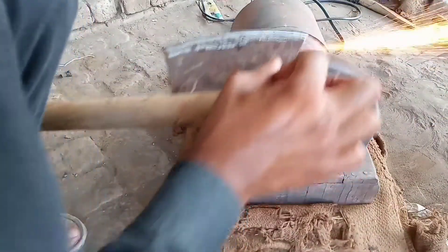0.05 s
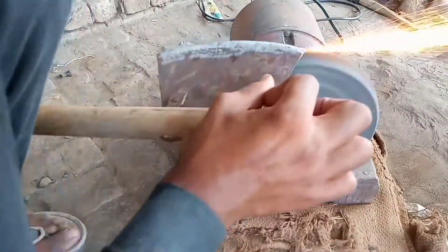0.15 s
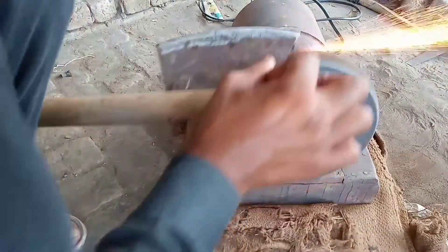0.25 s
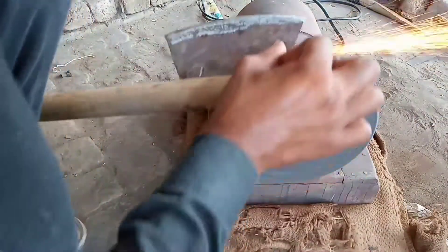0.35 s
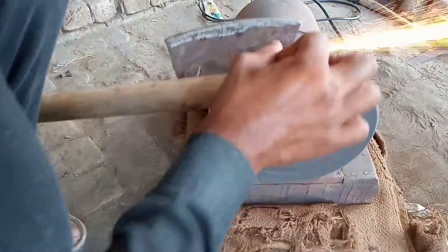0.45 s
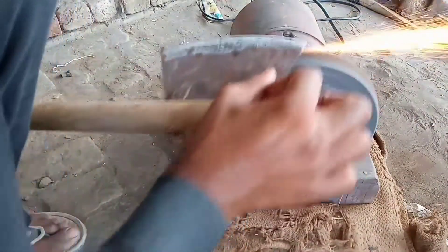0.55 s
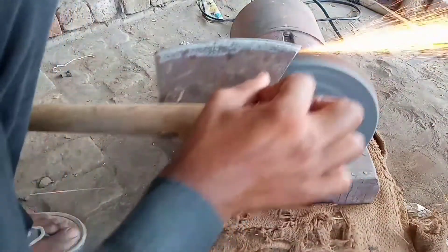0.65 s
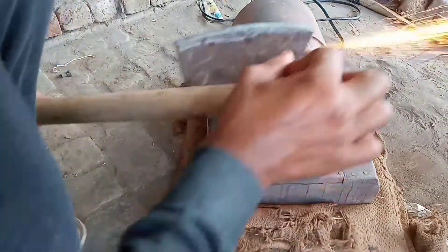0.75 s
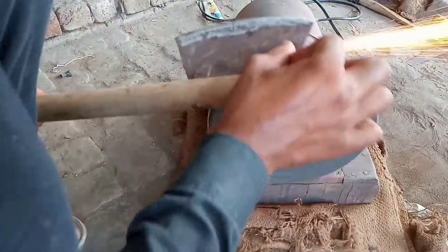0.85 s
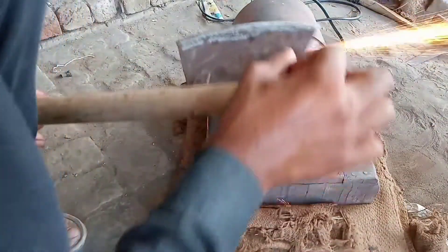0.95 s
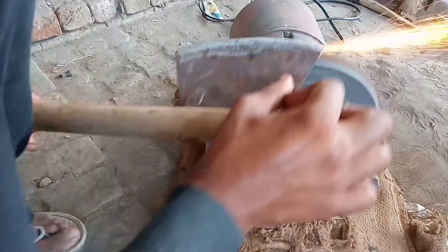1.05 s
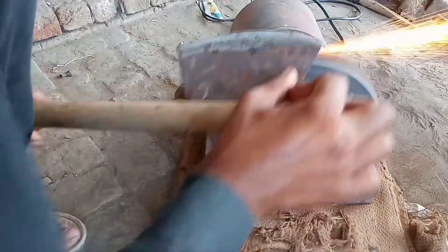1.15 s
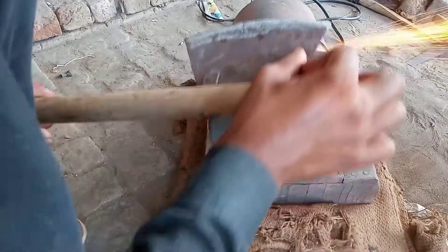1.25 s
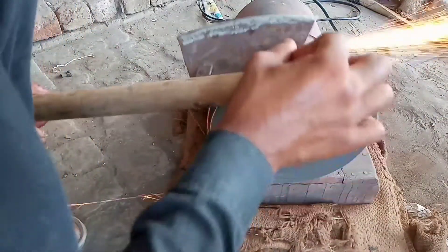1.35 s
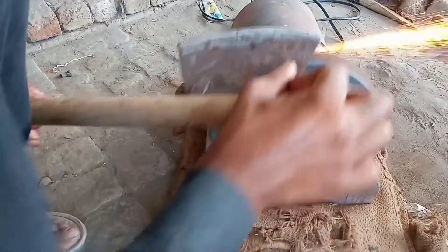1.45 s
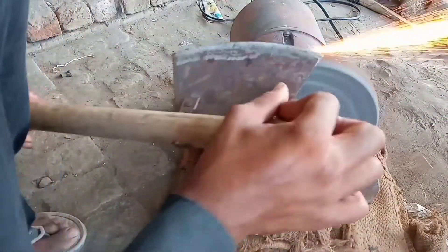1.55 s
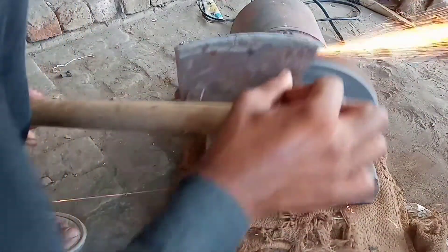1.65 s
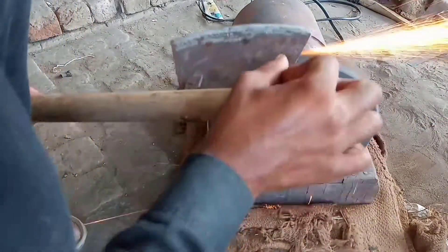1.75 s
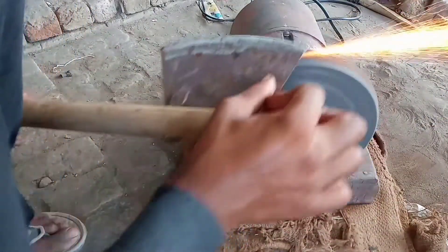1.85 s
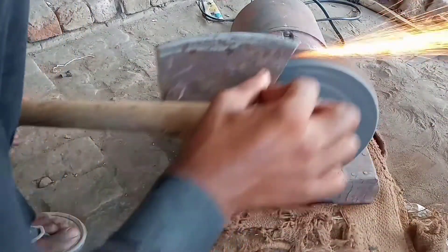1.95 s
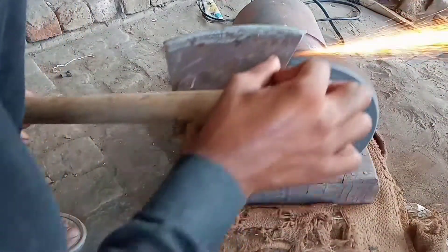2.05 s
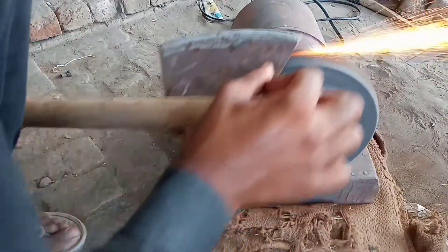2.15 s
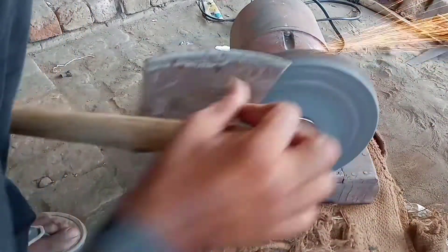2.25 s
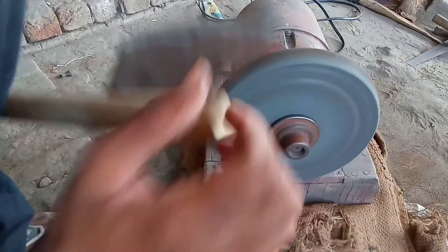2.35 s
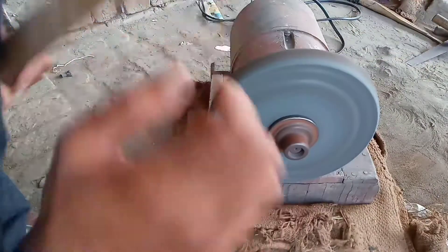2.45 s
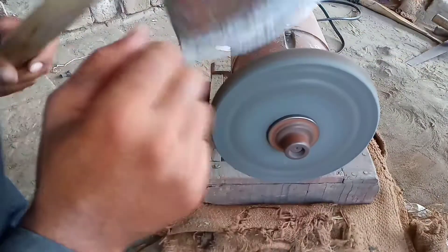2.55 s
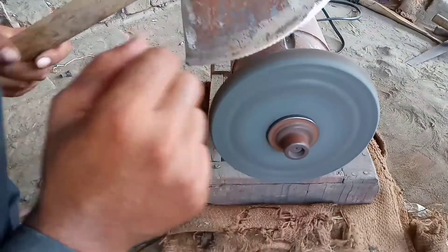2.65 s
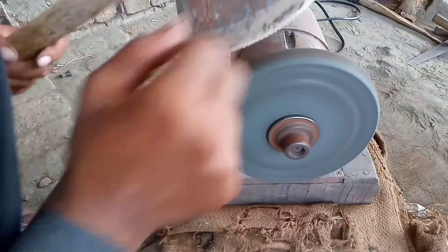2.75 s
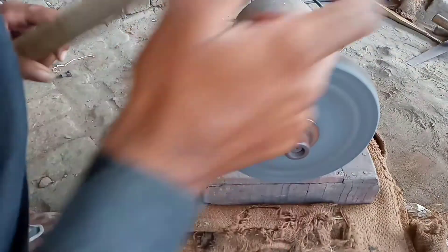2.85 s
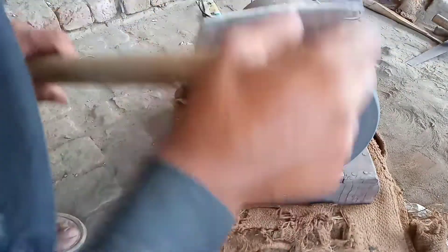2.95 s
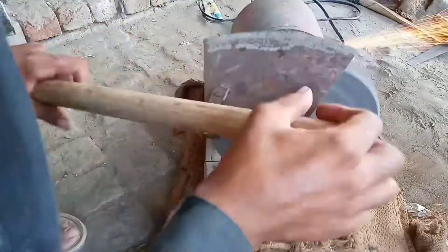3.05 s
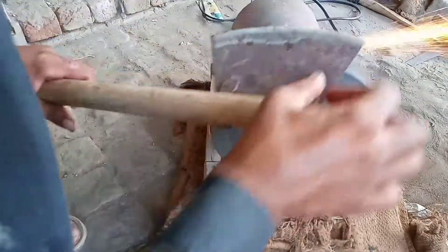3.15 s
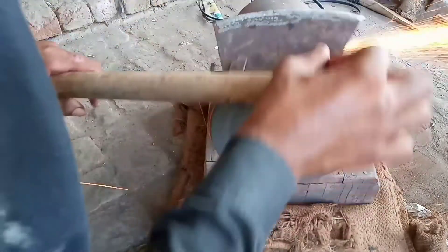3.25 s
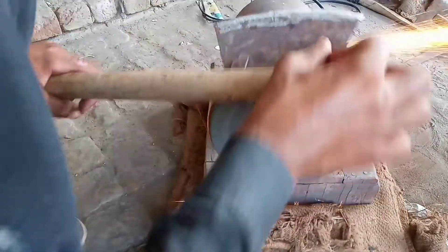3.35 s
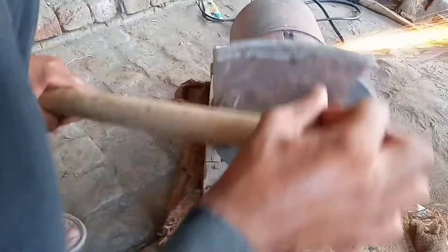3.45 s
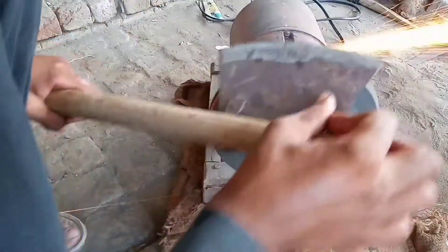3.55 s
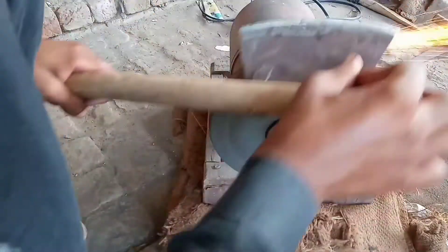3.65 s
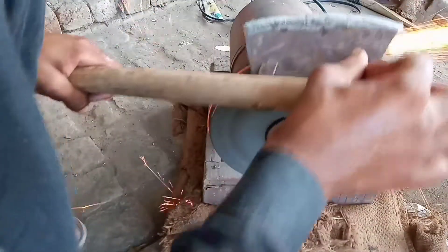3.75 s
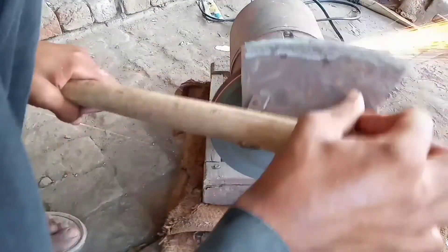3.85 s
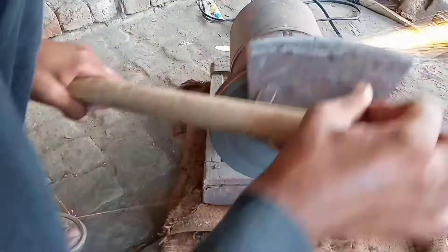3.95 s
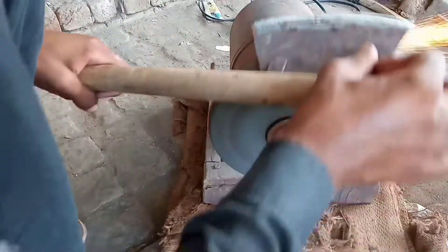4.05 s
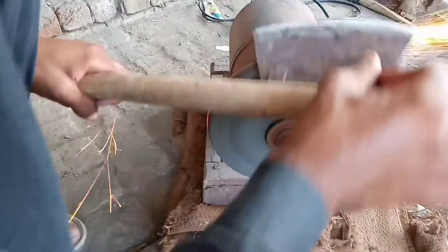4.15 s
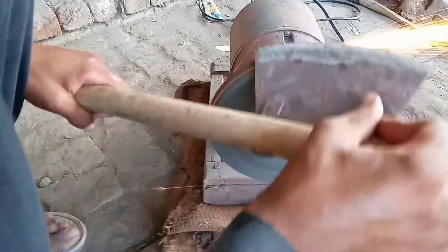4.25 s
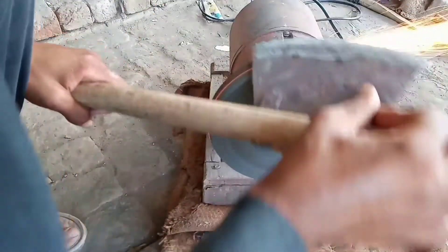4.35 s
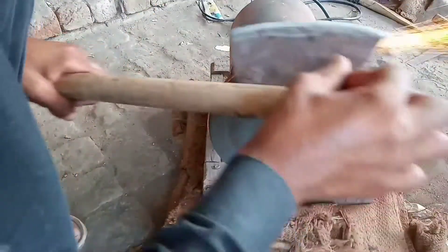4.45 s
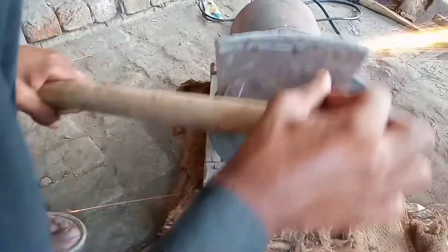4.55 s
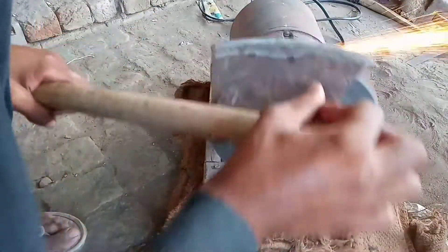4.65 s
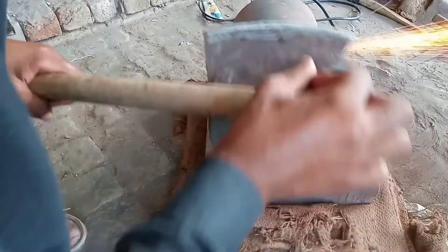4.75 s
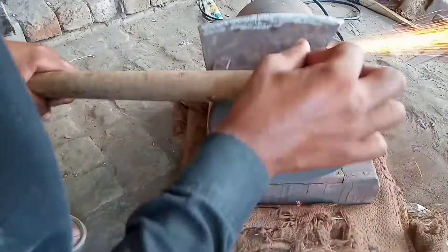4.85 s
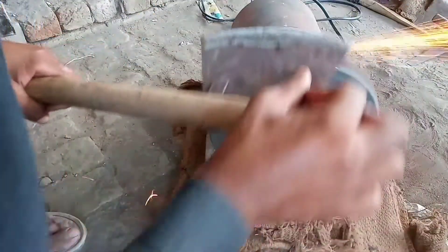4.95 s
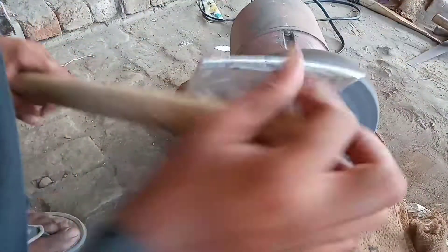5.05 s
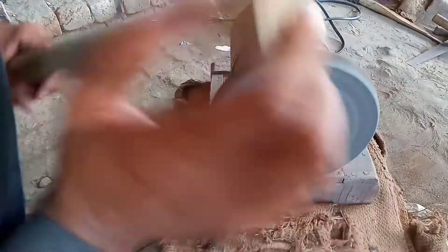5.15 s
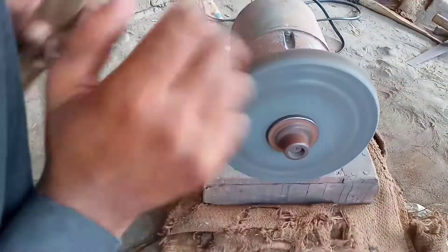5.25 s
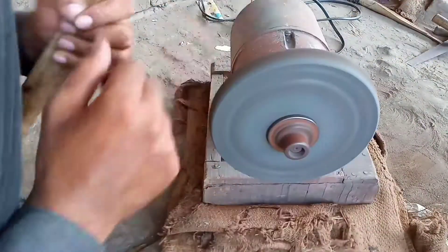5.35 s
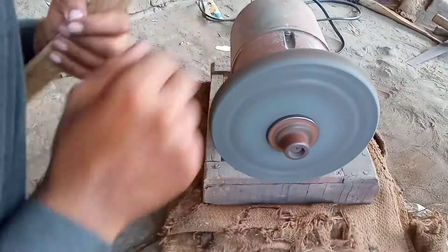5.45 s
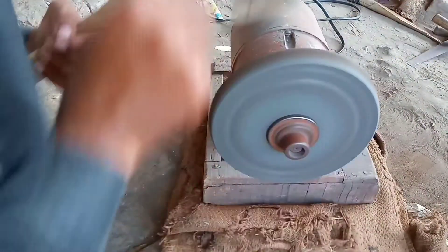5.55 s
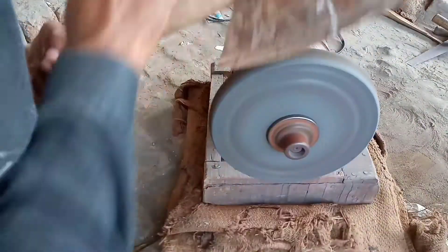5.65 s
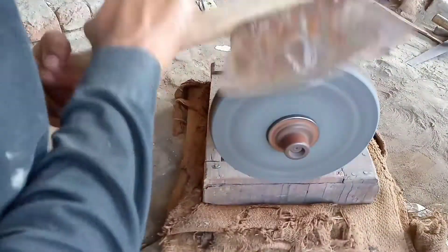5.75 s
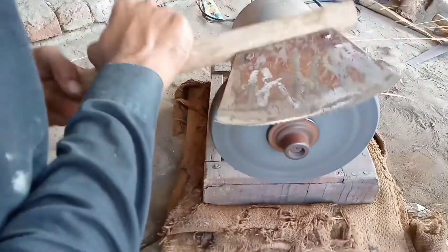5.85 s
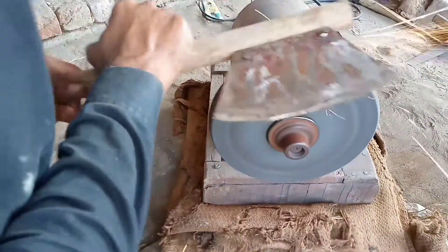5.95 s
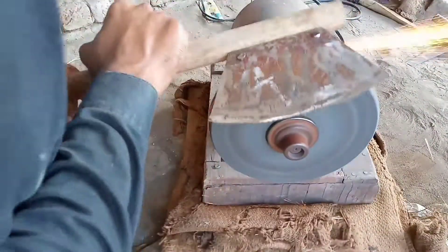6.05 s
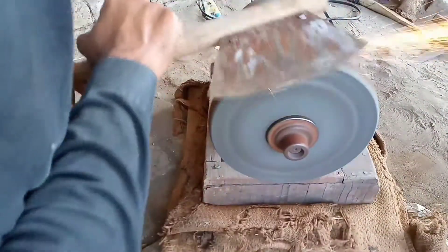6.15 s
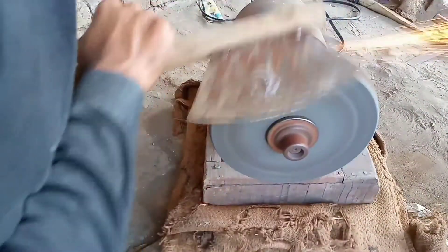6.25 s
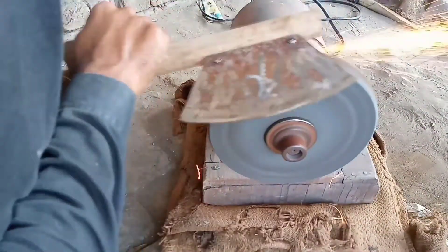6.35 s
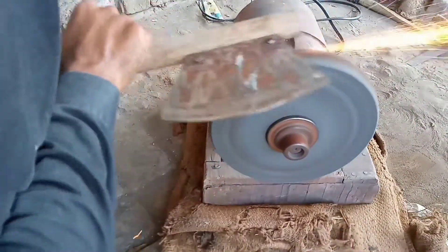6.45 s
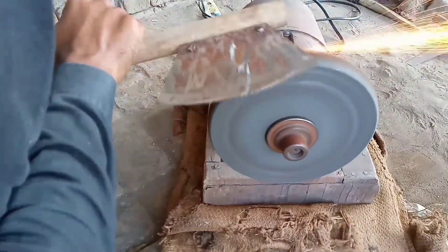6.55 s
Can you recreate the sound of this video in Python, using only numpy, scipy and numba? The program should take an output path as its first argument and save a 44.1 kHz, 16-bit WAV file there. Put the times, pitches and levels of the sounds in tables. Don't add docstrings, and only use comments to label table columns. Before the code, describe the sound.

Three strokes of steel on a grinding wheel, heard dry and near through a phone. The first is already under way, harsh and gritty with shifting high ringing; the second lands with a knock and sounds fuller; the last starts with clattering bounces and is shorter and softer. Between them the machine idles with a low hum, loose bearing ticks and housing rattle.

```python
import sys
import numpy as np
from scipy import signal
from scipy.fft import rfft, irfft, next_fast_len
from scipy.io import wavfile
from scipy.ndimage import uniform_filter1d
from numba import njit

SR = 44100
rng = np.random.default_rng(int(sys.argv[2]) if len(sys.argv) > 2 else 0)


def transcribe(u):
    v = np.clip(np.atleast_2d(u).T, -1, 1)
    q = np.round(v * 32767).astype(np.int16)
    wavfile.write(sys.argv[1], SR, q)


def field_ratio(decibels):
    return 10 ** (np.asarray(decibels, dtype=float) / 20)


N = 290619
STEP = 64
WHEEL_HZ = 35.82

# (touch [s], lift [s], bite [dB])
STROKES = [
    (0, 2.292, -26),
    (3.096, 5.072, -27),
    (5.988, 6.7, -32),
]
# (body [dB], rumble [dB], sizzle [dB])
STROKE_SHARES = [
    (-7, -18, -30),
    (-2, -25.5, -29),
    (-3, -24, -32.5),
]
# (time [s], length [s], extra bite [dB])
PUSHES = [(.09, 0.26, 4.5), (.6, 0.22, 5), (.78, 0.28, 5), (1.05, .15, 4.5), (1.24, .18, 5),
          (1.55, 0.23, 2), (1.82, .2, 1.5), (2.12, .12, 2), (2.26, .15, 3), (3.13, .12, 4), (3.55, 0.46, 7),
          (3.85, 0.24, 6), (4.05, .25, 4), (4.33, 0.44, 2.5), (4.52, .2, 3.5), (4.72, .25, 2.5),
          (5.05, 0.16, 4), (6.17, .12, 4), (6.27, .25, 4), (6.42, .25, 3.5), (6.62, 0.87, 9)]
# (time [s], length [s], weight [dB], sparks [dB])
LEANS = [(.2, 0.36, 4.5, 5), (.45, .2, 3, 3), (.68, 0.29, 8, 8), (.9, .2, 4, 0.1), (1.12, .4, 7, 5),
         (1.55, .3, 5, 2), (1.75, .3, 1, 3.5), (2.0, .25, 5, 2), (2.27, .3, 11, 8), (3.12, .2, 7, 7),
         (3.37, .2, -6, 1.5), (3.57, .3, 15, 6), (3.95, .35, 16, 4), (4.35, .35, 17, 4), (4.72, .35, 15, 3),
         (5.03, 0.17, 10, 5), (6.07, 0.18, 9, 3), (6.43, 0.22, 14, 4), (6.58, .2, 5, 5)]
# (time [s], length [s], drop [dB])
SKIPS = [(3.09, .012, -5), (3.335, .015, -3), (4.155, .02, -7), (4.183, .015, -4), (4.575, .015, -3),
         (6.028, .022, -12), (6.067, .026, -12), (6.098, .022, -10), (6.128, .01, -5), (6.143, .014, -6),
         (6.166, .016, -3), (6.193, .016, -3)]
# (time [s], peak [dB], body share [dB])
SNAGS = [(0.0194, -10, -1.5), (0.0453, -12, -1.5), (0.0643, -8, -1.5), (0.1206, -12, -1.5),
         (0.2224, -14, -1.5), (0.3257, -13, -1.5), (0.3815, -14, -1.5), (0.416, -16, -1.5),
         (0.4354, -16, -1.5), (0.4853, -17, -1.5), (0.5237, -15, -1.5), (0.5407, -13, -1.5),
         (0.5676, -11, -1.5), (0.6958, -11, -1.5), (0.7272, -12, -1.5), (0.7726, -10, -1.5),
         (0.8155, -12, -1.5), (0.8849, -17, -1.5), (0.9068, -17, -1.5), (0.9178, -13, -1.5),
         (0.9472, -15, -1.5), (0.9807, -14, -1.5), (1.0395, -10, -1.5), (1.1618, -13, -1.5),
         (1.2002, -13, -1.5), (1.2431, -9, -1.5), (1.2835, -11, -1.5), (1.3404, -14, -1.5),
         (1.3528, -16, -1.5), (1.3862, -14, -1.5), (1.4292, -15, -1.5), (1.4521, -17, -1.5),
         (1.4755, -14, -1.5), (1.4925, -10, -1.5), (1.5419, -13, -1.5), (1.6137, -16, -1.5),
         (1.6676, -13, -1.5), (1.6876, -13, -1.5), (1.712, -13, -1.5), (1.7699, -11, -1.5),
         (1.9405, -16, -1.5), (1.9634, -16, -1.5), (2.0502, -13, -1.5), (2.0892, -13, -1.5),
         (2.156, -12, -1.5), (2.2373, -12, -1.5), (2.2777, -14, -1.5),
         (3.1244, -10, -1.5), (3.1827, -15, -1.5), (3.1957, -14, -1.5), (3.2665, -12, -1.5),
                (3.3214, -13, -1.5), (3.3444, -15, -1.5), (3.3673, -13, -1.5), (3.3953, -13, -1.5),
                (3.4222, -9, -1.5), (3.4506, -10, -1.5), (3.4701, -9, -1.5), (3.5309, -11, -1.5),
                (3.6696, -10, -1.5), (3.7145, -12, -1.5), (3.7315, -12, -1.5), (3.7569, -16, -1.5),
                (3.7729, -16, -1.5), (3.7899, -14, -1.5), (3.8083, -11, -1.5), (3.8218, -12, -1.5),
                (3.8343, -12, -1.5), (3.8667, -10, -1.5), (3.9056, -11, -1.5), (3.9759, -13, -1.5),
                (4.0268, -14, -1.5), (4.0942, -13, -1.5), (4.1685, -16, -1.5), (4.1904, -12, -1.5),
                (4.2079, -12, -1.5), (4.4603, -11, -1.5), (4.4778, -11, -1.5), (4.4938, -9, -1.5),
                (4.5127, -12, -1.5), (4.5491, -14, -1.5), (4.5821, -13, -1.5), (4.6674, -14, -1.5),
                (4.7287, -15, -1.5), (4.7756, -15, -1.5), (4.7901, -13, -1.5), (4.818, -14, -1.5),
                (4.8355, -13, -1.5), (4.8829, -14, -1.5), (4.9108, -12, -1.5), (4.9457, -15, -1.5),
                (4.9692, -13, -1.5), (4.9866, -11, -1.5), (5.0465, -13, -1.5),
         (6.1553, -17, -1.5), (6.1742, -16, -1.5), (6.1997, -17, -1.5), (6.2346, -16, -1.5),
               (6.284, -12, -1.5), (6.3249, -17, -1.5), (6.3344, -15, -1.5), (6.3648, -11, -1.5),
               (6.4017, -14, -1.5), (6.4262, -13, -1.5), (6.4616, -14, -1.5), (6.4726, -11, -1.5),
               (6.515, -13, -1.5), (6.5708, -12, -1.5)]
# (time [s], peak [dB], ring [dB], body [dB])
CATCHES = [(.0185, -14, -33, -28), (.09, -25, -8, -29), (.54, -23.5, -3, -12), (1.4917, -14.5, -3, -6),
           (1.712, -20, -8, -13), (1.775, -23, -23, -12), (2.2387, -27, -23, 5), (2.2784, -22, -23, 2),
           (3.4496, -30, -19, 7), (3.47, -18, -29, -8), (5.0724, -25, -26, -19)]
# (time [s], peak [dB], ring [dB], body [dB])
BOUNCES = [(3.0761, -5, -40, -21.5), (3.0973, -16.5, -19, 1.5), (3.1224, -13.5, -31, -7),
           (5.8839, -14, -3, -1), (5.8924, -14.5, -9, -1), (5.944, -6.5, -13, -2), (5.9895, -20, -26, -16),
           (6.0016, -13, -25, -19), (6.015, -14, -20, -11), (6.0367, -7, -21, -16), (6.0778, -16.5, -17, 0),
           (6.1065, -11, -27, -9), (6.1194, -11.5, -31, -18), (6.149, -26, -19, -26),
           (6.1736, -25, -15, -11), (6.1998, -23, -17, -16), (6.234, -24.5, -6, 1), (6.2834, -18, -31, -14),
           (6.3153, -23, -6.5, -3), (6.3642, -14, -16, -19), (6.4033, -24, -15, -9)]
# (frequency [Hz], level [dB])
EDGE_TONE = [(25, -22), (80, -6), (450, -5), (1000, -13), (1500, -4), (2300, -2), (3300, -3), (4000, -6),
             (4800, -35.5), (5700, -27.5), (7200, -17), (7700, -35), (10300, -43), (15600, -51.5)]
PATCH_EDGES_HZ = [20, 700, 1150, 1750, 2300, 3000, 3550, 4700, 6000, 9000, 12000, 18000]
# (frequency [Hz], width [Hz], level [dB])
CHEEK_MODES = [(1266, 142, -10), (1588, 250, -9.5), (1875, 134, -12.5), (2088, 173, -14.5), (2577, 55, -15),
               (2948, 250, -13.5), (4135, 61, -21.5), (4470, 98, -24)]
# (time [s], length [s], swell [dB])
BOOMS = [(.1, .3, -4), (.47, .1, 3), (.75, .2, 3), (1.07, .2, 4), (1.5, .2, 2), (2.25, .15, 3),
         (3.15, .15, 4), (3.25, .2, 4), (3.45, .25, 5), (3.66, .15, 5), (4.0, .3, -5), (4.26, .1, 3),
         (4.35, .1, -3), (4.55, .2, 2), (4.72, .15, 1.5), (4.87, .15, 3), (5.0, .15, 3), (6.25, .15, 5)]
# (frequency [Hz], width [Hz], level [dB])
BLADE_MODES = [(4980, 150, -5), (5350, 100, -6), (6030, 50, 0), (6630, 60, -4), (7120, 70, -3),
               (7800, 55, -12), (8010, 45, -14), (8530, 60, -17), (9000, 60, -18), (9600, 130, -20),
               (10900, 100, -20), (11500, 100, -20), (12480, 100, -19), (12900, 110, -19),
               (13400, 140, -19), (14600, 75, -14), (15000, 90, -19), (15380, 70, -17)]
# (frequency [Hz], width [Hz])
SINGERS = [
    (2435, 35),
    (2718, 45),
    (3710, 22),
    (7270, 84),
]
SING_REST_DB = (-11, -9, -13, -25)
# (time [s], length [s], swell [dB])
SONGS_LOW = [(0.697, 0.27, 12), (1.075, 0.2, 11), (1.23, .16, 10), (1.622, .3, 7), (1.97, 0.23, 8),
             (2.23, .15, 10), (3.13, .13, 15), (3.21, .1, 8), (3.57, .25, 14.5), (4.05, .3, 14),
             (3.87, .2, 8), (4.3, 0.23, 8), (4.5, .3, 12), (4.69, .15, 15), (4.82, .1, 8),
             (5.035, 0.24, 14), (6.0, .1, 8), (6.58, .3, 6)]
SONGS_MID = [(.11, 0.27, 14), (.32, .2, 10), (.56, 0.13, 11), (.79, .2, 11.5), (1.3, 0.18, 4.4),
             (1.78, 0.27, 11.4), (2.2, .3, 5.4), (3.1, .1, 6), (3.7, .2, 12), (4.05, .25, 7.7),
             (4.84, 0.18, 5), (5.03, .15, 8.7), (4.5, .15, 7), (6.0, .05, 8), (6.22, .1, 8),
             (6.36, .35, 12), (6.55, .15, 6)]
SONGS_HIGH = [(.2, 0.43, 6.9), (.62, .3, 5.4), (1.065, .22, 14), (1.21, 0.22, 14), (1.54, .2, 12.4),
              (1.72, 0.16, 9), (1.88, .25, 10), (2.15, .2, 7.4), (3.15, .15, 8), (3.25, .24, 13),
              (3.42, .2, 11), (3.55, .15, 7), (3.7, .15, 11), (3.95, .3, 11), (4.25, .3, 9), (4.39, .15, 8),
              (4.59, .2, 11), (4.77, .14, 9), (5.04, .12, 13), (6.24, .2, 13), (6.42, .2, 11),
              (6.59, 0.35, 15)]
SONGS_TOP = [(.7, 0.23, 13), (2.22, .25, 10), (3.5, 0.39, 10), (4.3, .4, 9), (5.05, .15, 8), (6.09, .2, 17),
             (6.42, 0.28, 16), (6.57, 0.17, 12)]
# (frequency [Hz], width [Hz], level [dB])
HALO = (3790, 140, -12)
# (frequency [Hz], width [Hz], rest level [dB])
WHISTLE = (4520, 40, -30)
# (time [s], length [s], swell [dB])
WHISTLES = [(.96, .06, 10), (1.045, .09, 14), (1.27, .12, 12), (1.44, .08, 8), (1.51, .06, 11),
            (1.77, .06, 8), (1.87, .09, 14), (2.07, .1, 12), (6.25, .05, 10), (6.53, .1, 10)]
# (start [s], duck [s], rattle at start [dB], climb [dB per s])
PAUSES = [
    (2.335, 3.06, -51.5, 11.5),
    (5.1, 5.852, -50.5, 15.5),
]
# (frequency [Hz], level [dB])
RATTLE_TONE = [(25, -13), (100, -6.5), (300, 2), (650, -9), (1000, -5), (1500, -8), (2200, -11),
               (3700, -13), (4100, -55), (5500, -38.5), (6500, -32.5), (7400, -35.5), (8200, -55),
               (15600, -97)]
# (frequency [Hz], width [Hz], level [dB])
RATTLE_MODES = [(1890, 70, -3), (2730, 30, -9), (3700, 200, -11)]
# (frequency [Hz], width [Hz])
HOUSING = [
    (540, 40),
    (1322, 45),
]
# (time [s], length [s], swell [dB])
HUMS = [(2.72, .15, 5), (2.88, .1, 4), (3.03, .15, 6), (5.4, .15, 5), (5.62, .15, 3), (5.83, .06, 1.5)]
# (time [s], peak over the rattle [dB])
HARD_TICKS = [(2.4003, -13), (2.5195, -13), (2.5879, -12), (2.6318, -12), (2.7107, -5.5), (2.7677, -8.5),
              (2.8622, -16), (2.97, -5), (5.2236, -10), (5.252, -8), (5.2797, -5.5), (5.3349, -14),
              (5.3774, -12), (5.459, -9), (5.5135, -16), (5.5674, -12), (5.6502, -19), (5.6881, -18),
              (5.7796, -7), (5.8388, -10)]


def level(x):
    return x / np.sqrt(np.mean(x ** 2))


def band(x, lo_hz, hi_hz, order=2):
    return signal.sosfilt(signal.butter(order, [lo_hz, hi_hz], "band", fs=SR, output="sos"), x)


def colour(x, points):
    hz, db = np.transpose(points)
    grid = np.fft.rfftfreq(4096, 1 / SR)[1:]
    log_gain = np.log(field_ratio(np.interp(np.log(np.r_[1, grid]), np.log(hz), db)))
    cepstrum = irfft(log_gain)
    cepstrum[1:2048] *= 2
    cepstrum[2049:] = 0
    return signal.fftconvolve(x, irfft(np.exp(rfft(cepstrum))))[:N]


def walk(rate):
    k = int(SR / STEP / rate)
    held = np.repeat(rng.standard_normal(200), k)
    return 1.3 * uniform_filter1d(uniform_filter1d(held, k), k)[:N // STEP + 1]


def swells(rows):
    t, out = np.arange(N // STEP + 1) * STEP / SR, 0
    for s, length, db in rows:
        out = out + db * np.cos(np.pi * np.clip((t - s) / length, -.5, .5)) ** 2
    return np.interp(np.arange(N), t * SR, out)


def bursts(rate, spread_db, decay_s):
    hits = (rng.random(N) < rate / SR) * field_ratio(spread_db * np.minimum(rng.exponential(size=N), 2))
    return signal.lfilter([1], [1, -np.exp(-1 / (decay_s * SR))], hits)


def grit(coarse_db):
    return level(rng.standard_normal(N) * field_ratio(coarse_db * rng.exponential(size=N)))


@njit
def resonate(x, hz, gain, width_hz, step):
    y, z, r = np.empty(len(x)), 0j, np.exp(-np.pi * width_hz / SR)
    for k in range(len(hz)):
        turn = 2 * np.pi * hz[k] / SR
        p = complex(r * np.cos(turn), r * np.sin(turn))
        for i in range(k * step, min(len(x), (k + 1) * step)):
            z = z * p + gain[k] * x[i]
            y[i] = z.imag
    return y * np.sqrt(2 * (1 - r * r))


def ring(x, hz, width_hz, wander=0., fade_db=0., rate=5):
    pitch = hz * (1 + wander * walk(rate))
    return resonate(x + 1e-18, pitch, field_ratio(fade_db * walk(rate)), 1. * width_hz, STEP)


def squeal(hz, waver, rate):
    k = int(SR / rate)
    drift = np.repeat(rng.standard_normal(N // k + 1), k)[:N]
    pitch = hz * (1 + waver * uniform_filter1d(drift, k))
    return np.sqrt(2) * np.sin(2 * np.pi * np.cumsum(pitch) / SR)


def contact():
    t, out = np.arange(N) / SR, np.zeros((4, N))
    out[0] = -150
    lift_db_per_s = 700
    for (touch, lift, bite_db), shares in zip(STROKES, STROKE_SHARES):
        on = t >= touch
        out[0, on] = np.maximum(bite_db - lift_db_per_s * np.maximum(t[on] - lift, 0), -150)
        out[1:, on] = np.array(shares)[:, None]
    return out


def pressure():
    rest, body, rumble, sizzle = contact()
    push = swells(PUSHES)
    weight = swells([row[:3] for row in LEANS])
    sparks = swells([row[:2] + row[3:] for row in LEANS])
    body = body + .15 * weight + (0.37 - 1) * push
    rumble = rumble + weight + (0.37 - 1) * push
    sizzle = sizzle + sparks + (0.38 - 1) * push
    tables = [SONGS_LOW, SONGS_MID, SONGS_HIGH, SONGS_TOP]
    songs = [field_ratio(rest + db + swells(rows)) for db, rows in zip(SING_REST_DB, tables)]
    return field_ratio(rest + push), field_ratio(body), field_ratio(rumble), field_ratio(sizzle), songs


def snags():
    s, db, body_db = np.transpose(SNAGS)
    t = np.arange(SR // 20) / SR
    shape = np.exp(-t / .006) + 1.6 * np.exp(-t / .001)
    slack_db, slack_s = -3, .014
    loose = field_ratio(swells(SKIPS) + swells([(at - slack_s / 2, slack_s, slack_db) for at in s]))
    kicks = np.zeros((2, N))
    kicks[:, (s * SR).astype(int)] = field_ratio((np.array([db, db + body_db]) + 1.5) / 2)
    return loose * (1 + signal.fftconvolve(kicks, shape[None])[:, :N])


def landings():
    out = np.zeros((4, N))
    for rows, treble_db, t60 in [(CATCHES, -30, 0.039), (BOUNCES, -21, .035)]:
        for s, db, ring_db, body_db in rows:
            start = int(s * SR)
            t = np.arange(min(N - start, SR // 5)) / SR
            shape = np.exp(-np.log(1000) * t / t60) + 1.37 * np.exp(-t / 0.0008)
            shape += field_ratio(-14) * np.exp(-np.log(1000) * t / (3.5 * t60))
            gains = field_ratio(db + np.array([-6, ring_db, body_db, treble_db]))
            out[:, start:start + len(t)] += gains[:, None] * shape
    return out


def patchy(x):
    size = next_fast_len(N)
    spectrum, hz = rfft(x, size), np.fft.rfftfreq(size, 1 / SR)
    out = np.zeros(N)
    for lo, hi in zip(PATCH_EDGES_HZ, PATCH_EDGES_HZ[1:]):
        gain = field_ratio(min(hi / 1750, 1) * (2.6 * walk(11) - .8))
        gain = np.interp(np.arange(N), np.arange(N // STEP + 1) * STEP, gain)
        out += gain * irfft(spectrum * ((hz >= lo) & (hz < hi)), size)[:N]
    return out


def cheek(heavy, pressing):
    booming = heavy * field_ratio(swells(BOOMS))
    out = np.zeros(N)
    for hz, width, db in CHEEK_MODES:
        force, fade_db = (booming, 3.5) if hz < 1950 else (pressing, 4)
        out += field_ratio(db) * ring(force, hz, width, 0.0062, fade_db=fade_db, rate=8)
    return out


def blade(coarse, hiss, sizzle):
    out = []
    for k, (hz, width, db) in enumerate(BLADE_MODES):
        force = np.roll(coarse, N // 19 * (k + 1)) * (hiss if k < 5 else sizzle)
        mode = ring(force, hz, 0.8 * width, 0.0033, fade_db=3.8, rate=14)
        out.append(field_ratio(db) * np.sqrt(width) * mode)
    return sum(out[:5]), sum(out[5:])


def singing(fine, catch, songs, knocks):
    out = []
    for song, knock, (hz, width) in zip(songs, knocks, SINGERS):
        force = fine * (catch ** .45 * field_ratio(-3.5) * song + knock)
        out.append(ring(force, hz, width, 0.0028) + field_ratio(-5.5) * song * squeal(hz, .009, 45))
    return out


def axe():
    speed = WHEEL_HZ * (1 + 0.0618 * np.repeat(walk(3.4), STEP)[:N])
    turn = 2 * np.pi * np.cumsum(speed) / SR
    throb = field_ratio(1.1 * np.sin(turn) + 1.4 * np.sin(2 * turn))
    snag, snag_body = snags()
    jerks = 1 + 0.2 * bursts(90, 1.5, 0.0031) + 0.48 * bursts(220, 2.1, 0.0017)
    catch = field_ratio(-.7) * snag * level(throb * jerks)
    shudder = field_ratio(-.9) * snag_body * level(throb * (1 + 0.3 * bursts(50, 0.98, 0.0097)))
    bite, body, rumble, sizzle, songs = pressure()
    hit, hit_ring, hit_body, hit_treble = landings()
    fine, coarse = grit(1.5), grit(1.6)

    low = fine * (rumble * bite + field_ratio(-16) * hit_body)
    heavy = fine * (shudder * body * bite + field_ratio(-8) * hit_body)
    biting = fine * (catch * bite + field_ratio(-5.5) * hit)
    hiss = catch ** 1.02 * field_ratio(-17.0) * bite + field_ratio(-10) * hit_treble
    sizzle = field_ratio(1.8) * catch ** 1.1 * sizzle * bite + field_ratio(-19) * hit_treble
    scrape = field_ratio(27) * band(low, 20, 360) + field_ratio(15.5) * band(heavy, 300, 1950)
    scrape += field_ratio(9.5) * band(biting, 1950, 4700)
    scrape += field_ratio(29) * band(coarse * hiss, 4700, 7600)
    scrape += field_ratio(42.5) * band(coarse * sizzle, 7600, 17000)
    scrape = patchy(colour(scrape, EDGE_TONE))

    middle = cheek(heavy, fine * (catch * bite + field_ratio(-2.5) * hit))
    upper, top = blade(coarse, hiss, sizzle)
    knocks = [field_ratio(-17) * hit, field_ratio(-16) * hit, field_ratio(-1.0) * hit_ring, field_ratio(-20) * hit_treble]
    sing = singing(fine, catch, songs, knocks)
    hz, width, db = HALO
    middle += field_ratio(db) * ring(fine * catch * songs[2], hz, width, 0.008)
    hz, width, db = WHISTLE
    middle += field_ratio(db) * ring(fine * bite * field_ratio(swells(WHISTLES)), hz, width, 0.003)
    middle = band(middle + sum(sing[:3]), 832, 4600, order=6)
    upper = band(field_ratio(-26.0) * upper + sing[3], 4340, 7350, order=6)
    return scrape + middle + upper + field_ratio(-15.0) * band(top, 5700, 14400)


def idle_gain():
    t, db = np.arange(N) / SR, np.full(N, -49.5)
    free = np.zeros(N, bool)
    duck_db_per_s = 800
    for start, duck, start_db, climb_db in PAUSES:
        now = (t >= start) & (t < duck + .025)
        gain_db = start_db + climb_db * (t - start) - duck_db_per_s * np.maximum(t - duck, 0)
        db[now] = gain_db[now]
        free |= now
    return field_ratio(db), free


def bearing(rattle, free):
    jitter, scatter = rng.standard_normal((300, 2)).T
    at = (np.cumsum(1 + .2 * jitter) / WHEEL_HZ * SR).astype(int)
    out = np.zeros(N)
    out[at[at < N]] = field_ratio(-25 + 5 * scatter[at < N])
    s, db = np.transpose(HARD_TICKS)
    out[(s * SR).astype(int)] = field_ratio(db)
    return out * rattle * free + 1e-9


def machine():
    rattle, free = idle_gain()
    hum = field_ratio(np.where(free, 11 - 3.5 + swells(HUMS), 6.5))
    ticks = bearing(rattle, free)
    jolt = signal.lfilter([1], [1, -np.exp(-1 / (0.0024 * SR))], ticks / rattle)
    shake = grit(1.5) * level(1 + .5 * bursts(72, 2.6, 0.0046) + field_ratio(12) * jolt)
    broad = colour(shake, RATTLE_TONE)
    broad = broad / np.std(band(broad, 2050, 3650))
    broad = broad + (field_ratio(.4) - 1) * band(broad, 20, 290)

    modes = sum(field_ratio(db) * ring(shake, hz, width) for hz, width, db in RATTLE_MODES)
    for gain, (hz, width) in zip([hum, field_ratio(8)], HOUSING):
        modes = modes + gain * ring(shake, hz, width, 0.005)
    modes = modes + field_ratio(-4) * hum * squeal(HOUSING[0][0], .03, 25)

    ticks = ticks + 1e-9 * shake
    click = band(field_ratio(8.5) * ring(ticks, 9400, 250), 8600, 10200) + field_ratio(2.0) * band(ticks, 8000, 11500)
    click += field_ratio(31) * band(ticks, 6500, 6900, order=3) + field_ratio(46.5) * band(ticks, 2500, 3400, order=7)
    haze = field_ratio(-52) * band(ring(shake, 13550, 300), 12500, 14500)
    haze += field_ratio(-43) * band(shake * np.abs(shake) / 2, 8500, 15300)
    return rattle * (field_ratio(1.0) * broad + haze + band(modes, 311, 4620, order=8)) + click


def scene():
    return (axe() + machine())[None]


def roll_off(x):
    return signal.sosfilt(signal.butter(12, 15710, fs=SR, output="sos"), x)


def record(dry):
    rounded = np.tanh(1.622 * dry) / 1.584
    top_cut = signal.ellip(7, .2, 22, 15500, fs=SR, output="sos")
    mix = signal.sosfilt(top_cut, rounded)
    return roll_off(mix)


dry = scene()
out = record(dry)
transcribe(out)
```